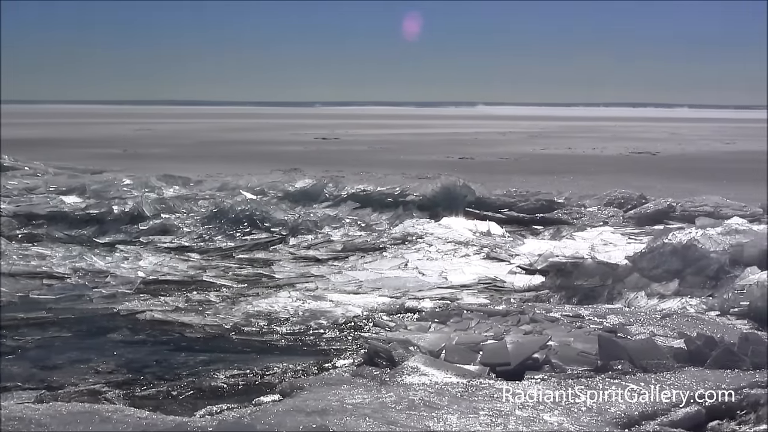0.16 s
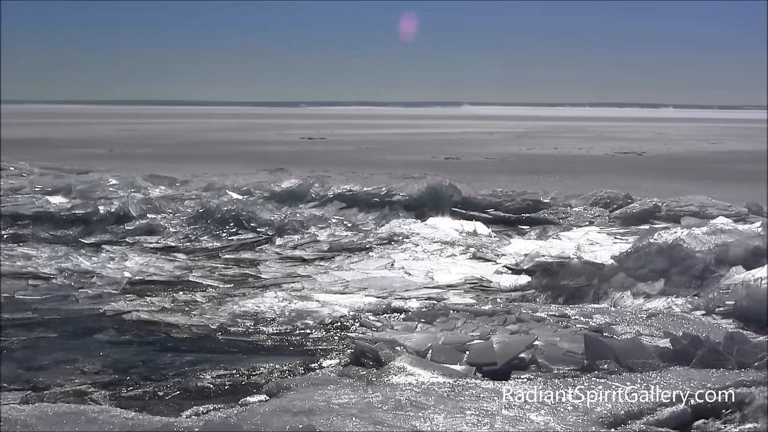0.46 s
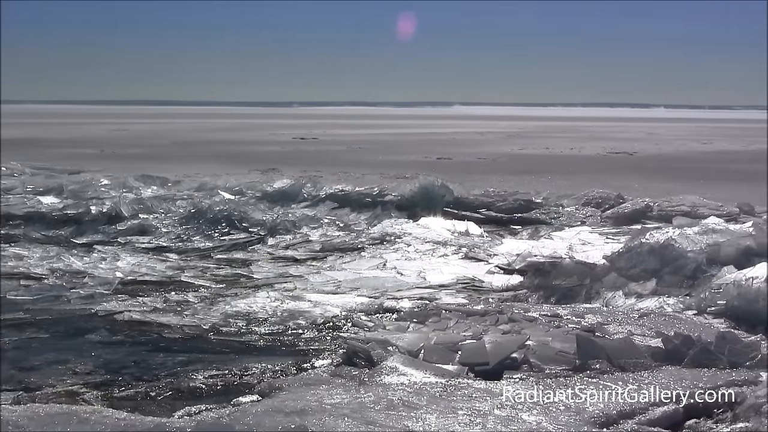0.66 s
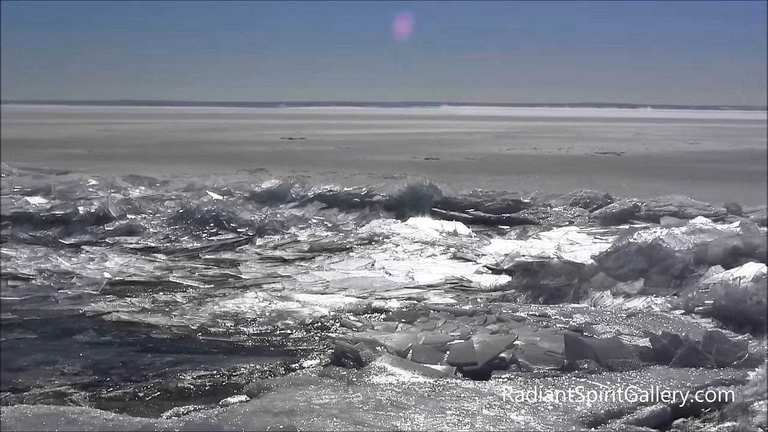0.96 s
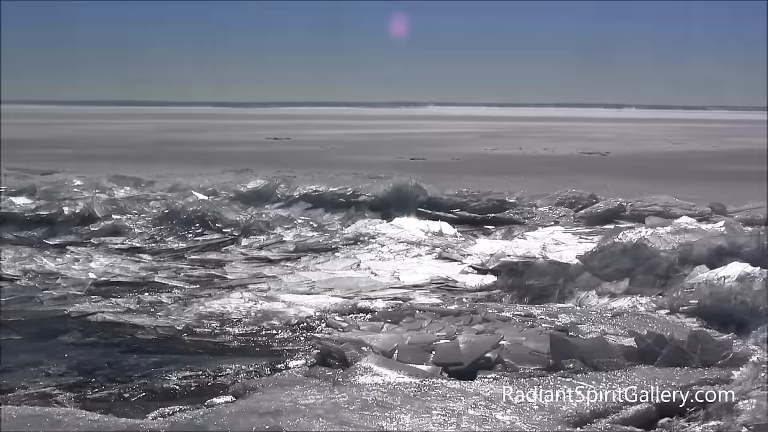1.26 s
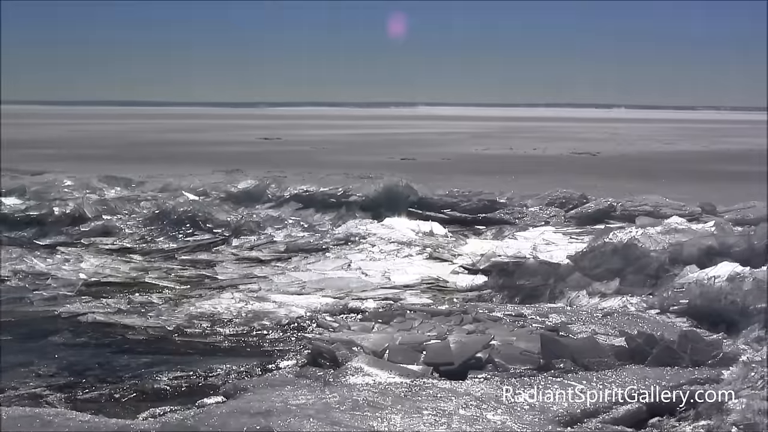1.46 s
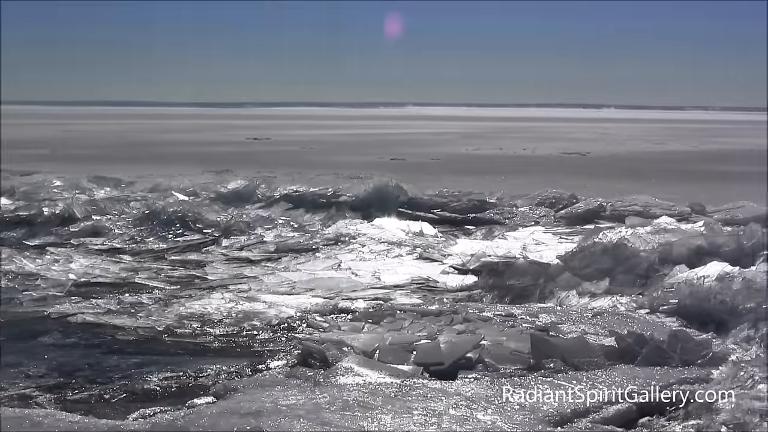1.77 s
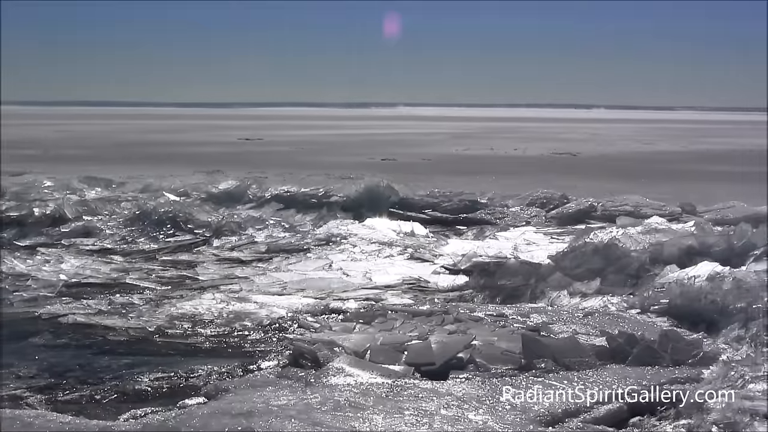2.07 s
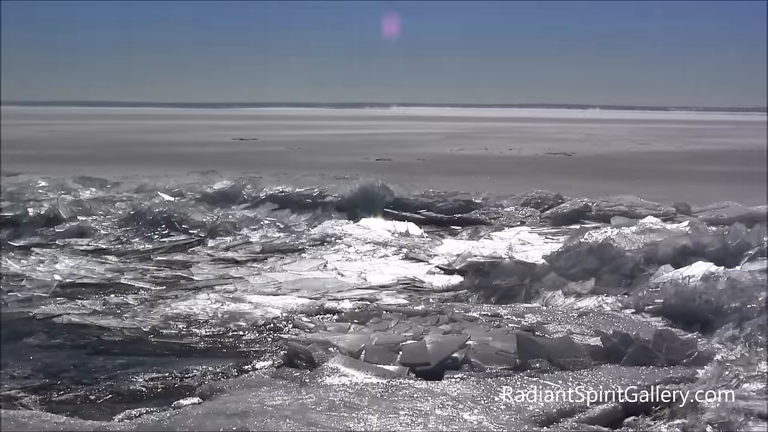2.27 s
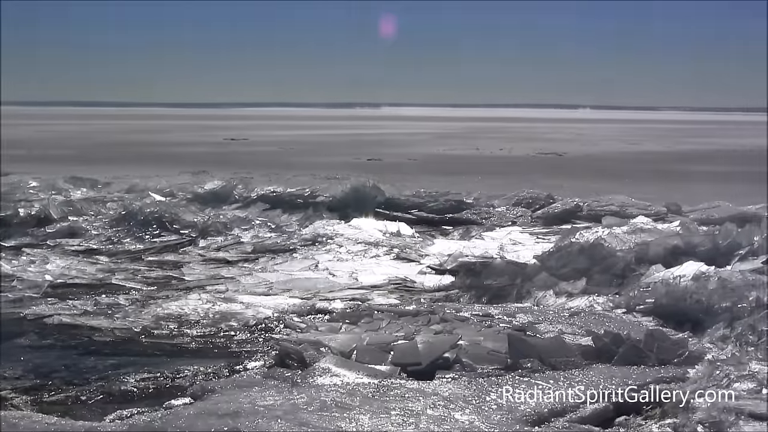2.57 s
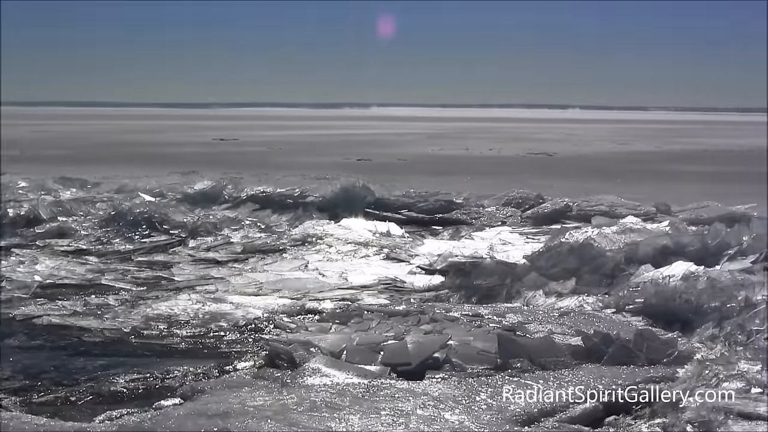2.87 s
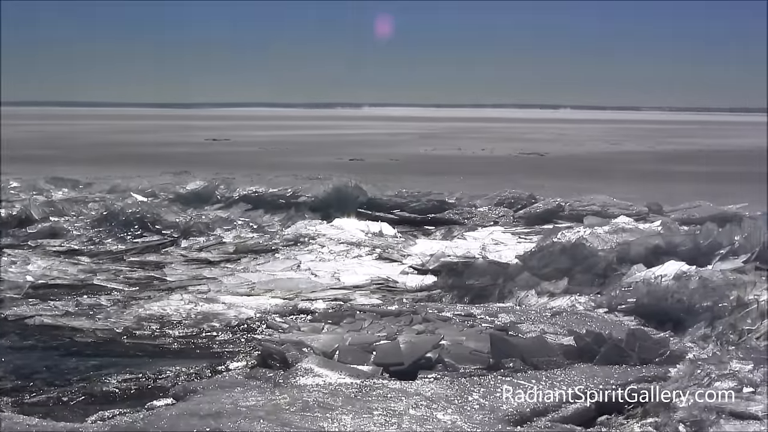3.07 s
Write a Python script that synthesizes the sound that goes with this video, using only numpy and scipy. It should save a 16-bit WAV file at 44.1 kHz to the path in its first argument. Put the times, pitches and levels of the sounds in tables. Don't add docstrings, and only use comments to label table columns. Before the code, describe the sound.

Ice breaks close by in a tight early burst and one hardest crack, followed by scattered clicks and a late scrape; low gusts buffet a handheld camera's stereo microphone, stronger on the left, with no room echo.

```python
import sys
import numpy as np
from scipy import signal
from scipy.fft import rfft, irfft, next_fast_len
from scipy.io import wavfile
from scipy.ndimage import uniform_filter1d, map_coordinates

SR = 44100
rng = np.random.default_rng(int(sys.argv[2]) if len(sys.argv) > 2 else 0)


def amplitude_ratio(level_db):
    exponent = np.asarray(level_db, float) / 20
    return 10 ** exponent


def output_pcm(signal):
    pcm = np.clip(np.atleast_2d(signal).T, -1, 1) * 32767
    wavfile.write(sys.argv[1], SR, np.round(pcm).astype(np.int16))


N = 142443


def unit(x):
    return x / np.sqrt(np.mean(x ** 2) + 1e-20)


def along(points, hz):
    f, v = np.transpose(points)
    return np.interp(np.log(hz + 1), np.log(f + 1), v)


def curves(rows):
    s, *cols = np.transpose(rows)
    return [np.interp(np.arange(N) / SR, s, c) for c in cols]


def wobble(rate):
    knots = rng.standard_normal(int(N * rate / SR) + 4)
    return map_coordinates(knots, [np.arange(N) * rate / SR])


def filtered(x, response):
    m = next_fast_len(x.shape[-1] + 8192)
    spectrum = rfft(x, m) * response(np.fft.rfftfreq(m, 1 / SR))
    return irfft(spectrum, m)[..., :x.shape[-1]]


def sides(db):
    return amplitude_ratio(np.array([db / 2, -db / 2]))


def add_at(out, s, sound):
    start = round(s * SR)
    out[:, start:start + sound.shape[1]] += sound


def rush(spectrum, alike, patchy_db):
    z = signal.stft(rng.standard_normal((2, N)), nperseg=512)[2]
    field = uniform_filter1d(rng.standard_normal(z.shape[1:]), 6, 0)
    field = uniform_filter1d(field, 10, 1)
    pair = signal.istft(z * amplitude_ratio(patchy_db * unit(field)), nperseg=512)[1][:, :N]

    def mid_side(hz):
        turn = np.arccos(along(alike, hz)) / 2
        return amplitude_ratio(along(spectrum, hz)) * [np.cos(turn), np.sin(turn)]

    mid, side = filtered(pair, mid_side)
    return unit(np.array([mid + side, mid - side]))


def wash():
    # f/Hz, level per Hz/dB
    wash_spectrum = [(88, -31), (150, -4.5), (339, -4), (374, -10), (1050, -10), (1640, -14), (3170, -26),
                     (9600, -36.5), (15600, -40.5)]
    # f/Hz, left-right likeness
    likeness = [(60, 0.82), (130, 0.031), (290, -0.56), (640, 0.12), (1410, 0.34), (3100, -0.064),
                (6820, 0.16), (15000, 0.22)]
    # f/Hz, left over right/dB
    balance = [(60, -5), (180, 3.5), (550, 1), (1650, 5.5), (4970, 5.5), (15000, 0)]
    noise = rush([(60, -34)] + wash_spectrum, likeness, patchy_db=1.14)
    noise = filtered(noise, lambda hz: sides(along(balance, hz)) * (hz < 15750))
    level_db = -33.5 + 0.16 * wobble(3.4) + 0.43 * wobble(15)
    return amplitude_ratio(level_db) * noise


def buffet():
    # t/s, left level/dB, right level/dB
    gusts = [(0, -17.5, -27), (.2, -19, -33), (.31, -16, -21.5), (.38, -12, -20), (.52, -15.5, -24),
             (.59, -11.5, -15), (.64, -17.5, -27.5), (.72, -11.5, -19), (.86, -11, -20), (1.3, -16.5, -29),
             (1.51, -7, -13.5), (1.6, -12.5, -22), (2.05, -13.5, -23), (2.14, -12.5, -24),
             (2.45, -16, -24.5), (2.62, -12.5, -19), (2.98, -17.5, -27.5), (3.17, -8.5, -16)]
    # f/Hz, level per Hz/dB
    rumble = [(2.4, -31), (4.0, -3), (27, -2), (70, -9), (134, -21.5), (247, -30.5), (369, -35), (500, -43),
              (650, -46.5), (1100, -120)]
    # f/Hz, left-right likeness
    port_likeness = [(25, 0.65), (60, 0.39), (130, 0.15), (290, -0.58)]
    even, even_s = 0.57, 0.1
    eddies = rush(rumble + [(1200, -74)], port_likeness, patchy_db=1)
    power = uniform_filter1d(eddies ** 2, round(even_s * SR / 2))
    power = uniform_filter1d(power, round(even_s * SR))
    strength = np.sqrt(np.abs(power) + 1e-3)
    return amplitude_ratio(np.array(curves(gusts))) * unit(eddies / strength ** even)


def knock(t, hz, cycles):
    u = t * hz
    rise = 1 - np.exp(-(u / 0.71) ** 2)
    wave = -rise * np.exp(-3 * u / cycles) * np.sin(2 * np.pi * u)
    return wave / np.abs(wave).max(-1, keepdims=True)


def crackle():
    per_s, floor_db, spread_db, low_hz = 90, -46, 12.5, 1250
    out, t = np.zeros((2, N + SR)), np.arange(512) / SR
    draw = rng.random((400, 4))
    times = np.cumsum(-np.log(1 - draw[:, 0])) / per_s
    hz = low_hz * 2 ** (2.53 * (draw[:, 1:2] - .4))
    waves = knock(t, hz, 1.65) * amplitude_ratio(floor_db + spread_db * draw[:, 2:3])
    for s, wave, place in zip(times[times < N / SR], waves, draw[:, 3]):
        add_at(out, s, sides(12 * place - 3)[:, None] * wave)
    return out[:, :N]


def knocks():
    # t/s, peak level/dB,
    # f/Hz, life/cycles, left over right/dB
    slabs = [(.014, -30, 747, 13, 1), (.07, -32.5, 760, 14, -4), (.286, -27.5, 743, 11, 0),
             (0.3079, -20, 1200, 3.3, 5), (0.3088, -24, 1550, 4.5, 4), (0.35, -36, 4900, 40, 4),
             (.513, -28, 1140, 3.6, 1.5), (0.5693, -32, 2620, 8, 3), (1.5658, -26.5, 620, 1.9, 7),
             (1.5638, -23.5, 2900, 3.6, 8), (2.102, -32, 860, 8, 1), (2.115, -33.5, 3300, 6, 5),
             (2.4795, -40, 3740, 30, 4), (0.3068, -9.5, 563, 2.9, 6.5), (0.3442, -12.5, 900, 2.4, 4.5),
             (.381, -19.5, 910, 1.8, 3), (0.5597, -17, 960, 1.4, 5), (0.6502, -26, 1360, 4.7, 8),
             (0.8731, -6, 1070, 2.7, 4), (1.134, -21, 1035, 2.8, 6.5), (1.196, -31.5, 900, 8, -10),
             (1.5035, -23, 630, 2.8, 7), (1.5633, -18, 1150, 1, 4), (2.1553, -29.5, 720, 3, -4),
             (2.116, -24.5, 1760, 4.6, 6), (3.024, -24.5, 1490, 10, 0), (3.027, -29, 960, 19, -5),
             (.3078, -19.5, 2440, 6.8, 4), (0.8733, -17, 2680, 6.1, 9), (1.1346, -34, 2400, 5.1, 6),
             (.5597, -24, 2600, 7.5, 5), (0.6497, -30, 2530, 8, 10), (2.1156, -30.5, 4900, 19, 5),
             (.3445, -22.5, 5000, 3.8, 13), (.3445, -21, 2400, 3, 6),
             (.193, -33, 750, 8, 1.5), (.5598, -28, 1600, 3, 4), (1.5642, -27, 4750, 6, 5),
                   (1.5645, -28, 5860, 12, 4), (2.479, -42, 2940, 20, 5), (2.746, -34, 990, 6, 1),
                   (2.781, -33, 980, 9.3, .6), (2.786, -40, 2440, 14, 1.1), (3.031, -34, 2070, 10, 0),
                   (3.4, -34, 1000, 8.7, 2.1), (3.068, -32, 850, 16, 2.1), (2.8, -30, 860, 6.9, 1.1),
                   (3.128, -40, 3100, 40, 1.1), (2.8, -28, 830, 7, 1.1),
             (.8732, -16, 1550, 3, 4),
        (2.1142, -20, 1035, 5, 5),
        (2.1152, -19.5, 1035, 4, 5),
    ]
    out, t = np.zeros((2, N + SR)), np.arange(2048) / SR
    for s, db, hz, cycles, pan_db in slabs:
        add_at(out, s, amplitude_ratio(db + 2) * sides(pan_db)[:, None] * knock(t, hz, cycles))
    return out[:, :N]


def snaps():
    # t/s, peak level/dB, centre f/Hz, t60/s, width/octaves
    splinters = [(.3078, -10.5, 5050, 0.015, 0.88), (0.313, -23, 8000, .015, 0.56),
                 (0.3437, -12, 5400, .014, 0.44), (0.3454, -21.5, 12000, 0.013, 0.59),
                 (0.3803, -23.5, 5370, .006, 0.88), (0.5587, -16, 4500, 0.0045, 0.63),
                 (0.649, -14, 11500, 0.006, 0.62), (.650, -21.5, 2600, 0.0084, 1.1),
                 (0.857, -34, 11000, .03, .3), (0.8726, -11.5, 6400, .008, 0.6),
                 (1.134, -32.5, 6000, 0.0085, 0.86), (1.197, -34.5, 5770, 0.012, 0.27),
                 (1.303, -37.5, 5500, .01, .4), (1.4894, -42, 10000, .015, .06),
                 (1.504, -25.5, 9000, 0.0082, 0.9), (1.536, -29, 8000, 0.0072, 0.91),
                 (1.5565, -29, 8000, 0.01, 0.72), (1.5638, -14, 5570, 0.011, 1.1),
                 (2.1143, -23.5, 4200, 0.011, 1.5), (2.26, -33, 9030, 0.015, .35),
                 (2.479, -40, 3100, 0.03, .35), (2.477, -31.5, 8730, .02, 0.66)]
    # t/s, peak level/dB, centre f/Hz,
    # t60/s,
    scrapes = [
        (.8826, -28, 10000, .012, .6),
        (3.0251, -30, 3700, .065, .99),
        (3.0861, -34, 10500, .01, .33),
        (.2251, -24, 240, .41, 1.01),
        (2.6001, -37, 1100, .24, .68),
        (3.0561, -27, 1100, .3, .7),
        (2.7451, -32, 1400, .2, .73),
        (3.1221, -29, 950, .5, .9),
        (.4901, -25, 320, .34, .51),
    ]
    rise_s, click = .0003, 3.82
    tail_db, tail_t60_s = -10, 0.026
    alike, apart_hz = 0.83, 10900
    lead_s = .005
    out, t = np.zeros((2, N + SR)), np.arange(8192) / SR - lead_s
    after = np.maximum(t, 0)
    rise = 1 - np.exp(-after / rise_s)
    tail = amplitude_ratio(tail_db - 60 * after / tail_t60_s)
    splinter_db, scrape_db = 1.5, 2
    placed = [(row, splinter_db) for row in splinters] + [(row, scrape_db) for row in scrapes]
    for (s, db, hz, t60, octaves), pan_db in placed:
        shape = rise * (amplitude_ratio(-60 * after / t60) + tail)
        burst = rng.standard_normal((3, len(t))) * shape
        burst[0, shape.argmax()] -= click

        def band(f):
            share = alike / (1 + (f / apart_hz) ** 6)
            split = np.sqrt([share, 1 - share, 1 - share])
            bell = np.exp(-.5 * (np.log2((f + 1) / hz) / octaves) ** 2)
            return split * np.sqrt(hz / (f + hz / 4)) * bell

        common, *own = filtered(burst, band)
        tone = common + np.array(own)
        tone = tone / np.abs(tone).max()
        add_at(out, s - lead_s, amplitude_ratio(db - 1.5) * sides(pan_db)[:, None] * tone)
    return out[:, :N]


def shoves():
    # t/s, peak level/dB, half width/s, left over right/dB
    pushes = [
        (.379, -13, 0.0096, 2),
        (.463, -15, 0.0076, 8),
        (.592, -5, 0.0082, 5.5),
        (.733, -12, 0.0055, 14),
        (1.49, -7, 0.011, 12),
    ]
    # t/s, peak level/dB, half width/s, left over right/dB
    pulls = [
        (.362, -12.5, 0.012, 6),
        (.695, -9, 0.01, 6.7),
        (.803, -12, 0.0061, 6),
        (1.525, -5, 0.0074, 7),
    ]
    t, out = np.arange(N) / SR, np.zeros((2, N))
    for rows, way in ((pushes, 1), (pulls, -1)):
        for s, db, half_s, pan_db in rows:
            u = (t - s) / half_s
            pulse = (1 - 0.35 * u ** 2) * np.exp(-u ** 2 / 2)
            out += way * amplitude_ratio(db) * sides(pan_db)[:, None] * pulse
    return out


def scene():
    # t/s, level/dB
    surge = [(0, -1.5), (.3, 0.5), (.55, 0), (.87, -1), (1.6, 1.5), (2.7, 0.5), (2.78, 1), (2.9, 0),
             (3.025, 1), (3.06, 3.5), (3.14, 4), (3.23, 3.5)]
    lag_s, duck_s, duck_db, back_db_per_s = .000045, .874, -6.5, 0.84
    t = np.arange(N) / SR
    gain_db = (t > duck_s) * (duck_db + back_db_per_s * (t - duck_s))
    push_db, = curves(surge)
    lag = lambda hz: np.exp(1j * np.pi * hz * lag_s * np.array([[1], [-1]]))
    near = filtered(knocks() + snaps(), lag)
    far = amplitude_ratio(push_db) * wash() + amplitude_ratio(2.05 * push_db) * crackle()
    wind = buffet() + shoves()
    return near + amplitude_ratio(gain_db) * (far + wind)


def roll_off(x):
    return signal.sosfilt(signal.butter(12, 15850, fs=SR, output="sos"), x)


def record(dry):
    limited = dry / (1 + np.abs(dry / .99) ** 12) ** (1 / 12)
    mix = filtered(limited, lambda hz: hz < 16450)
    return roll_off(mix)


dry = scene()
out = record(dry)
output_pcm(out)
```